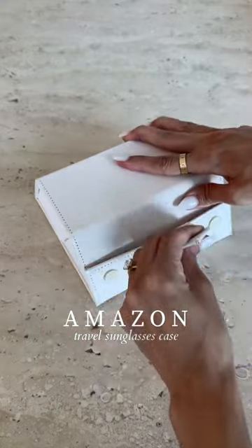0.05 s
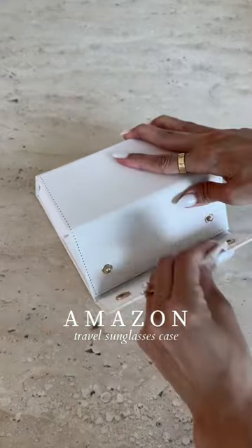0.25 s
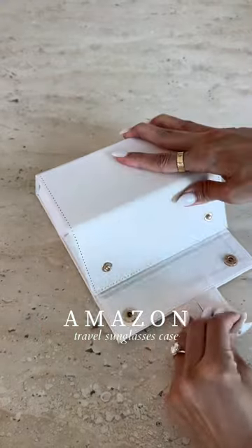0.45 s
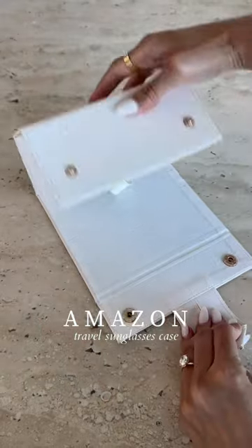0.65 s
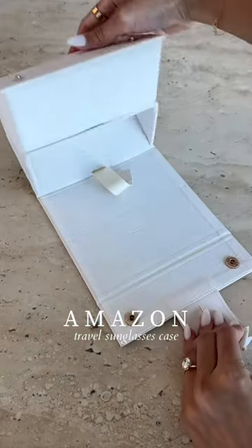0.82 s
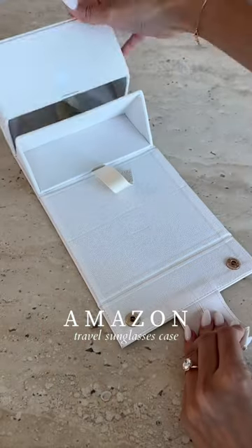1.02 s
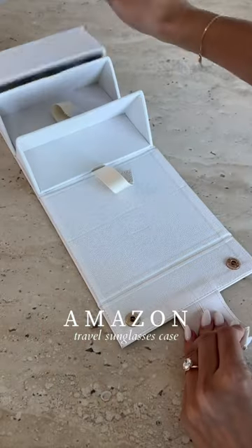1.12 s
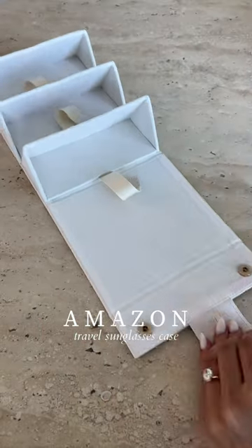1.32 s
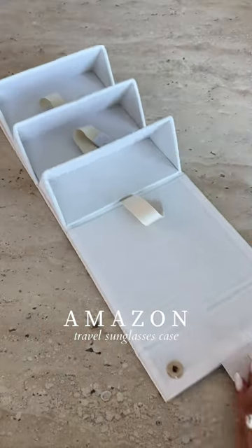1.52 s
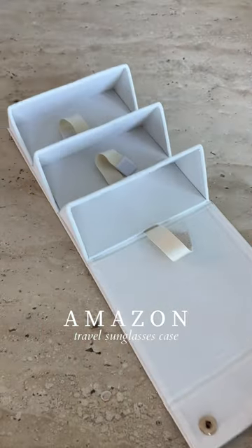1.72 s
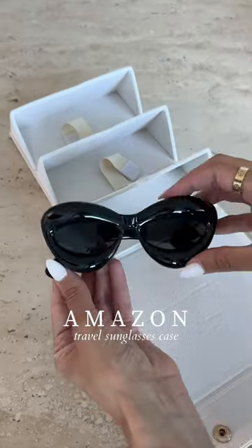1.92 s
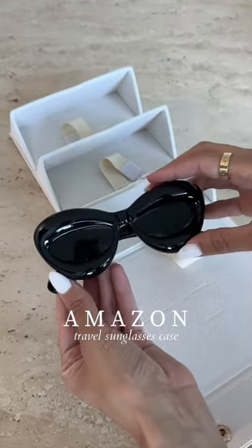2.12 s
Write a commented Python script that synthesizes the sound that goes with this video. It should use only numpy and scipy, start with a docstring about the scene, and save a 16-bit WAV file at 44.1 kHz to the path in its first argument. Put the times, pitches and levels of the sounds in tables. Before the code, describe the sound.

Close up in a small live room, snap buttons crack open on a hollow stiff case, its walls tumble with light taps and two loud knocks, then a short rough drag over stone fades to quiet.

```python
"""Leatherette case opened and dragged on stone

A stiff leatherette case on a stone table, close to the microphone in a small live room.
Two snap buttons pop open and the flap drops: cracks and damped modes, then rattling grains and a low shudder.
The compartments unroll with a rustle of swelling noise and knock down one after another, booming in the case.
The open case is dragged over the stone, its panel ringing under rough noise; two faint touches follow.
Steady coloured noise is the room tone; a decaying noise tail answers everything else."""
import sys
import numpy as np
from scipy import signal
from scipy.fft import rfft, irfft, next_fast_len
from scipy.io import wavfile
from scipy.ndimage import uniform_filter1d, map_coordinates

SR = 44100
rng = np.random.default_rng(int(sys.argv[2]) if len(sys.argv) > 2 else 0)


def pcm_store(signal):
    """Save signal as 16-bit PCM."""
    levels = np.round(np.clip(np.atleast_2d(signal), -1, 1) * 32767)
    wavfile.write(sys.argv[1], SR, levels.astype(np.int16).T)


N = 94815
TIME = np.arange(N) / SR  # seconds into the scene
AGE = np.arange(SR // 2) / SR  # seconds since a blow

# the level drops sharply at these times, each part's sound fading to a brief remainder
FIRST_DROP_S, SECOND_DROP_S, THIRD_DROP_S = 0.597, 1.316, 1.872
RISE_CYCLES = 0.2  # time constant of a mode's swelling, in its own cycles

# colour of a sharp crack: (frequency [Hz], level [dB])
CRACK_COLOUR = [(300, -19.5), (1500, -19.5), (4000, -4), (4900, 0), (6500, -2.5), (9700, 0), (12000, -6.5),
                (14500, -2), (17000, -21)]
# colour of small hard contacts: (frequency [Hz], level [dB])
CLICK_COLOUR = [(300, -19.5), (750, -3.5), (1100, -4), (1700, -6.5), (2350, -4), (3000, -3), (3900, -6.5),
                (5100, -4), (6800, -3.5), (7800, -10), (11000, -36), (16000, -51.5)]
# colour of the board's dull push: (frequency [Hz], level [dB])
THUMP_COLOUR = [(40, -24.5), (110, -9), (200, -1), (500, 9), (800, -0.5), (1300, -7.5), (2100, -9.5),
                (3000, -24.5), (8000, -41), (16000, -59.5)]


def snap():
    """The stud cracks out of its socket and rings the closed case; the flap rattles and the case shudders."""
    # the snap lets go in stages: (time [s], ring of the case [dB], crack [dB], thump [dB],
    # stud resonance [Hz], stud [dB])
    pops = [(0.2193, -30, -43.5, -39, 1523, -37.5), (0.222, -7, -10, -20, 3900, -14),
            (0.2274, -27, -14.5, -26, 2800, -18.5), (0.2281, -2, -10, -24, 2764, -10)]
    # modes of the closed case under the snap: (frequency [Hz], level [dB], t60 [s])
    shell = [(235, -16, 0.13), (404, -11, .032), (631, -5.5, 0.024), (786, -8.5, .03), (1130, -13.5, .012),
             (1640, -8, .009), (2755, -7.5, 0.0071), (3897, -11, .006), (14500, -27.5, .008)]
    # colour of loose flap and studs: (frequency [Hz], level [dB])
    rattle_colour = [(300, -13.5), (1000, 4.5), (1400, -5.5), (2200, -2.5), (3800, -0.5), (5000, -11),
                     (7000, -11.5), (9000, -15), (11000, -41)]
    # colour of the case shuddering on the table: (frequency [Hz], level [dB])
    jolt_colour = [(30, -22.5), (80, -1), (130, -4.5), (210, 3.5), (300, -7), (600, -39)]
    out = np.zeros(N)
    for s, ring_db, crack_db, thump_db, stud_hz, stud_db in pops:
        add(out, s, amp(ring_db) * ring(shell))
        crack = amp(crack_db) * contact(CRACK_COLOUR)
        thump = amp(thump_db) * contact(THUMP_COLOUR)
        stud = amp(stud_db) * contact(CLICK_COLOUR, tilt_db=-3, peak_hz=stud_hz)
        add(out, s, crack + thump + stud)
    freed_s = pops[-1][0]
    rattle = fading(freed_s, rise_s=0.0042, t60=0.38) * coloured(grains(per_s=3000), rattle_colour)
    jolt = fading(freed_s, rise_s=0.0093, t60=0.61) * coloured(rng.standard_normal(N), jolt_colour)
    return out + amp(-36) * rattle + amp(-36) * jolt


def knocks(start_s, end_s):
    """Walls landing between two times; each blow also booms in the hollow case."""
    # a wall of the case is knocked: (time [s], level [dB], pitch [Hz], t60 [s], boom [dB], boom length [ratio],
    # thump [dB]); the length ratio scales only the boom's t60
    blows = [(0.3766, -26, 301, 0.034, -50, .8, -34), (0.578, -42.5, 700, 0.019, -56, 1, -41.5),
             (0.9504, -41.5, 680, 0.015, -57.5, 0.7, -35), (0.9539, -31, 265, 0.04, -36, 0.8, -38),
             (0.9587, -41.5, 432, 0.22, -55.5, 0.87, -45.5), (1.1651, -15, 422, 0.05, -28, 0.67, -27.5),
             (1.178, -32.5, 507, 0.073, -35, 0.606, -39.5), (1.2329, -15, 945, 0.029, -29.5, 0.83, -59)]
    # modes of a wall: (pitch [ratio], level [dB], t60 [ratio])
    wall = [(0.72, -10.5, 0.67), (0.999, -0.5, 0.8), (1.55, -27.5, 1), (2.3, -22, 0.88)]
    out = np.zeros(N)
    for s, db, hz, t60, boom_db, life, thump_db in blows:
        if start_s <= s < end_s:
            modes = [(hz * ratio, level, t60 * mode_life) for ratio, level, mode_life in wall]
            add(out, s, amp(db) * ring(modes) + amp(boom_db) * boom(life))
            add(out, s, amp(thump_db) * contact(THUMP_COLOUR))
    return out


def boom(life):
    """The hollow case's low modes; the settling walls shift their pitch."""
    # modes of the hollow: (frequency [Hz], level [dB], t60 [s] before scaling by life)
    modes = [(35, -20.5, 0.17), (135, 0.5, 0.26), (204.2, -7, 0.37), (281.5, -11, 0.06),
             (437.8, -14.5, 0.17)]
    wander_hz, wander_step_s = 3.5, 0.02
    out = np.zeros(len(AGE))
    for k, (hz, db, t60) in enumerate(modes):
        steps = rng.standard_normal(size=64)
        drift_hz = wander_hz * map_coordinates(steps, [AGE / wander_step_s], mode="nearest")
        tone = np.sin(2 * np.pi * np.cumsum(hz + drift_hz) / SR)
        swell = 1 - np.exp(-AGE * hz / RISE_CYCLES)
        out += (-1) ** k * amp(db - 60 * AGE / (t60 * life)) * tone * swell
    return out


def clicks(start_s, end_s):
    """Studs, nails and edges touching between two times, each a resonant contact with a sharp crack."""
    # small hard contacts: (time [s], level [dB], tilt [dB per octave], own resonance [Hz], crack [dB])
    touches = [(0.3719, -15, -1.6, 5700, -32), (0.3735, -20.5, -1, 1940, -45),
               (0.3754, -18.5, 0, 2600, -31.5), (0.3811, -19.5, -0.5, 1770, -35),
               (0.4927, -31, -2.5, 2430, -70), (.578, -42, -1.5, 1200, -43),
               (0.948, -32.5, -5, 2250, -75.5), (0.951, -31.5, -9, 3100, -94),
               (0.9729, -39.5, -3, 2000, -81), (1.162, -24, -4.5, 1960, -53.5),
               (1.2314, -14, -1.5, 7000, -48.5), (1.233, -12, 1.5, 6656, -44), (2.082, -65, 5, 3650, -89),
               (2.102, -53, 3.5, 3700, -79.5)]
    out = np.zeros(N)
    for s, db, tilt_db, hz, crack_db in touches:
        if start_s <= s < end_s:
            touch = amp(db) * contact(CLICK_COLOUR, tilt_db, hz)
            add(out, s, touch + amp(crack_db) * contact(CRACK_COLOUR))
    return out


def rustle():
    """Leatherette brushing as the compartments unroll: swells of coloured noise."""
    # brushes: (time of the peak [s], half length [s], level [dB])
    brushes = [(0.662, 0.023, -75), (0.732, 0.032, -70.5), (0.893, 0.018, -69.5), (0.94, 0.023, -69),
               (1.162, 0.0093, -57.5), (1.23, 0.0084, -51), (1.244, 0.02, -39), (1.28, 0.081, -60.5)]
    # colour: (frequency [Hz], level [dB])
    brush_colour = [(200, 5), (500, -4), (950, -1.5), (1600, -8), (3500, -9), (6900, -5.5), (9000, -19),
                    (15000, -37)]
    return rubbing(brushes, brush_colour)


def shuffle():
    """Dull shuffling of the settling walls: swells of low noise."""
    # shuffles: (time of the peak [s], half length [s], level [dB])
    swells = [(0.998, 0.019, -48.5), (1.183, 0.02, -40.5)]
    # colour: (frequency [Hz], level [dB])
    dull_colour = [(60, -20.5), (150, 0), (300, 1), (430, 7.5), (560, -1.5), (800, -1), (1200, -17.5),
                   (3000, -42), (8000, -55.5)]
    return rubbing(swells, dull_colour)


def drag():
    """The stone's grain plucks the sliding panel, which rings in a few resonances."""
    # drag over the stone: (time [s], level [dB])
    course = [(1.34, -48), (1.372, -43), (1.52, -42), (1.62, -43), (1.69, -45), (1.76, -55.5),
              (1.80, -72.5), (1.84, -90.5)]
    # colour of the scrape: (frequency [Hz], level [dB])
    scrape_colour = [(30, -51), (100, -3), (200, -11.5), (260, -11.5), (550, -12), (800, -10.5), (1200, -3),
                     (1700, -10.5), (2100, -8), (3600, -13), (5300, -10), (9000, -19), (11500, -43),
                     (15000, -30.5), (17000, -49.5)]
    # panel resonances: (centre [Hz], width [Hz], level [dB])
    resonances = [(795, 70, -14.5), (1162, 85, -7.5), (2022, 68, -17.5), (2390, 80, -17), (3000, 210, -19)]
    # slow noise, gone above some 100 Hz: (frequency [Hz], level [dB])
    wobble_colour = [(1, 0), (40, 0), (120, -60), (400, -120)]
    start_s, rise_s, wobble_db = 1.323, 0.008, 1.0

    rough = rng.standard_normal(N) + amp(-5) * grains(per_s=1400)
    force = patchy(rough, depth_db=2.4)
    panel = np.zeros(N)
    for centre, width, db in resonances:
        def band(f):
            return 1j * f * width / (centre * centre - f * f + 1j * f * width)
        panel += amp(db) * unit(filtered(force, band))
    wobble = coloured(rng.standard_normal(N), wobble_colour)
    level_db = np.interp(TIME, *np.transpose(course)) + wobble_db * wobble
    moving = np.clip((TIME - start_s) / rise_s, 0, 1)
    return moving * amp(level_db) * unit(coloured(force, scrape_colour) + panel)


def room_tone():
    """The room's steady hum: stereo noise, most alike in the bass."""
    # colour: (frequency [Hz], level [dB])
    hum_colour = [(20, -18), (36, -10), (60, -5), (180, -17), (400, -31.5), (1400, -37), (2400, -43),
                  (4000, -46.5), (16000, -61)]
    return amp(-64.5) * coloured(diffuse(rng.standard_normal((2, N))), hum_colour)


def heard(x, lag_ms, pan_db, room_db, stop_s):
    """Direct sound and the room's answer; pan raises left and lowers right, lag delays left against right."""
    # room decay: (frequency [Hz], t60 [s])
    room_t60 = [(120, 0.15), (700, 0.49), (3000, .44), (7000, 0.44), (14000, 0.28)]
    # colour of the room's answer: (frequency [Hz], level [dB])
    room_send = [(100, -7.5), (250, -6), (700, -6), (1400, -12), (3000, -11), (7000, -13), (9500, -18),
                 (11500, -32), (14000, -28.5)]
    # direct sound: (frequency [Hz], left minus right [dB])
    side_tilt = [(150, -1.3), (500, 0), (1200, -1), (2400, -2), (4400, -2.6), (8000, -0.5)]
    room_delay_s, room_build_s = 0.0026, 0.0069
    stop_fade_s, stop_left_db, stop_t60_s = 0.005, -18.5, 0.07

    # each band of the noise tail decays at its own rate, scaled to equal energy
    hz, t, z = signal.stft(rng.standard_normal((2, len(AGE))), SR, nperseg=256)
    t60 = along(room_t60, hz)[:, None]
    z *= amp(-60 * t / t60) * np.sqrt(2 * np.log(1000) / (t60 * SR))
    tail = signal.istft(z, SR, nperseg=256)[1][:, :len(AGE)]
    tail = filtered(diffuse(tail), lambda f: amp(along(room_send, f)))
    tail *= np.clip((AGE - room_delay_s) / room_build_s, 0, 1)

    sides = np.array([[1], [-1]])  # left, right

    def arrival(f):
        delay = np.exp(-1j * np.pi * f * sides * lag_ms / 10 ** 3)
        return amp(sides * along(side_tilt, f) / 2) * delay

    direct = amp(pan_db * sides) * filtered(x, arrival)
    wet = amp(room_db) * signal.fftconvolve(x[None], tail, axes=1)[:, :N]
    # the sound drops quickly to a lingering remainder, which dies away after the stop
    lingering = amp(stop_left_db - 60 * np.maximum(TIME - stop_s, 0) / stop_t60_s)
    return (direct + wet) * np.clip((stop_s - TIME) / stop_fade_s, lingering, 1)


def diffuse(pair):
    """Two unrelated noises mixed to a set likeness between the sides, strongest in the bass."""
    # likeness of left and right: (frequency [Hz], correlation)
    alike = [(150, 0.91), (300, 0.96), (550, 0.089), (1300, 0.36), (4000, 0.29)]

    def mid_side(hz):
        turn = np.arccos(np.clip(along(alike, hz), -1, 1)) / 2
        return np.array([np.cos(turn), np.sin(turn)])

    mid, side = filtered(pair, mid_side)
    return np.array([mid + side, mid - side])


def ring(modes):
    """Damped modes of alternating sign that swell within their first cycle."""
    out = np.zeros(len(AGE))
    for k, (hz, db, t60) in enumerate(modes):
        swell = 1 - np.exp(-AGE * hz / RISE_CYCLES)
        out += (-1) ** k * amp(db - 60 * AGE / t60) * np.sin(2 * np.pi * hz * AGE) * swell
    return out


def contact(spectrum, tilt_db=0, peak_hz=None, size=2048):
    """A sharp push and a brief chatter through a causal colour, perhaps with a resonance of its own."""
    peak_db, peak_octaves, chatter_t60_s = 8.5, 0.26, 0.01
    hz = np.maximum(np.fft.rfftfreq(size, 1 / SR), spectrum[0][0])
    colour_db = along(spectrum, hz) + tilt_db * np.log2(hz)
    if peak_hz:
        colour_db += peak_db * np.exp(-(np.log2(hz / peak_hz) / peak_octaves) ** 2)
    # folding the cepstrum forward gives minimum phase: nothing sounds before the push
    cepstrum = irfft(np.log(amp(colour_db)))
    cepstrum[1:size // 2] *= 2
    cepstrum[size // 2 + 1:] = 0
    pulse = irfft(np.exp(rfft(cepstrum)))
    force = rng.standard_normal(size) * amp(-60 * AGE[:size] / chatter_t60_s)
    force /= np.linalg.norm(force)
    force[0] += 1  # the push, equal in energy to the chatter
    return signal.fftconvolve(force, pulse / np.abs(pulse).max())


def grains(per_s):
    """Tiny pushes at random moments, at rms 1."""
    return unit((rng.random(N) < per_s / SR) * rng.standard_normal(N))


def fading(start_s, rise_s, t60):
    """A quick rise and a steady decay."""
    age = np.maximum(TIME - start_s, 0)
    return (1 - np.exp(-age / rise_s)) * amp(-60 * age / t60)


def rubbing(swells, spectrum):
    """Soft bell-shaped swells of leatherette rubbing on itself."""
    level = sum(amp(db) * np.exp(-((TIME - s) / half) ** 2) for s, half, db in swells)
    return level * coloured(rng.standard_normal(N), spectrum)


def patchy(x, depth_db):
    """x with its colour shifting in small patches, as the touching spots change."""
    z = signal.stft(x, nperseg=512)[2]
    field = uniform_filter1d(rng.standard_normal(z.shape), size=6, axis=0)  # over frequency
    field = unit(uniform_filter1d(field, size=5, axis=1))  # over time
    return unit(signal.istft(z * amp(depth_db * field), nperseg=512)[1][:N])


def amp(db):
    """Decibels to gain."""
    return 10 ** (np.asarray(db) / 20)


def unit(x):
    """Scale to rms 1."""
    return x / np.sqrt(np.mean(x ** 2) + 1e-20)


def along(points, hz):
    """Read (Hz, value) points on a log frequency axis."""
    f, v = np.transpose(points)
    return np.interp(np.log(hz + 1), np.log(f + 1), v)


def add(track, s, x):
    """Mix x into the track from time s."""
    part = track[int(round(s * SR)):][:len(x)]
    part += x[:len(part)]


def filtered(x, response):
    """x times a complex response of frequency."""
    n = x.shape[-1]
    m = next_fast_len(n + SR // 4)
    return irfft(rfft(x, m) * response(np.fft.rfftfreq(m, 1 / SR)), m)[..., :n]


def coloured(x, spectrum):
    """x with a spectrum, at rms 1."""
    return unit(filtered(x, lambda hz: amp(along(spectrum, hz))))


def scene():
    """Unsnapping, unrolling, dragging and two last touches over the room tone."""
    end = 2 * N / SR  # past the last sample: no stop
    case_lag_ms = 0.024
    opening = clicks(0, FIRST_DROP_S) + knocks(0, FIRST_DROP_S)
    unrolling = clicks(FIRST_DROP_S, SECOND_DROP_S) + rustle()
    landing = knocks(FIRST_DROP_S, SECOND_DROP_S) + shuffle()
    touches = clicks(SECOND_DROP_S, end)
    return (heard(snap(), 0.042, pan_db=0.97, room_db=0.03, stop_s=FIRST_DROP_S)
            + heard(opening, case_lag_ms, pan_db=0.0, room_db=4.0, stop_s=FIRST_DROP_S)
            + heard(unrolling, case_lag_ms, pan_db=1.0, room_db=4.0, stop_s=SECOND_DROP_S)
            + heard(landing, case_lag_ms, pan_db=0.87, room_db=-5.5, stop_s=SECOND_DROP_S)
            + heard(drag(), 0.04, pan_db=0.93, room_db=4.5, stop_s=THIRD_DROP_S)
            + heard(touches, case_lag_ms, pan_db=0.8, room_db=-0.5, stop_s=end)
            + room_tone())


def record(dry):
    """Nothing is kept above the band limit."""
    top_hz = 16800
    return filtered(dry, lambda hz: hz < top_hz)


dry = scene()
out = record(dry)
pcm_store(out)
```